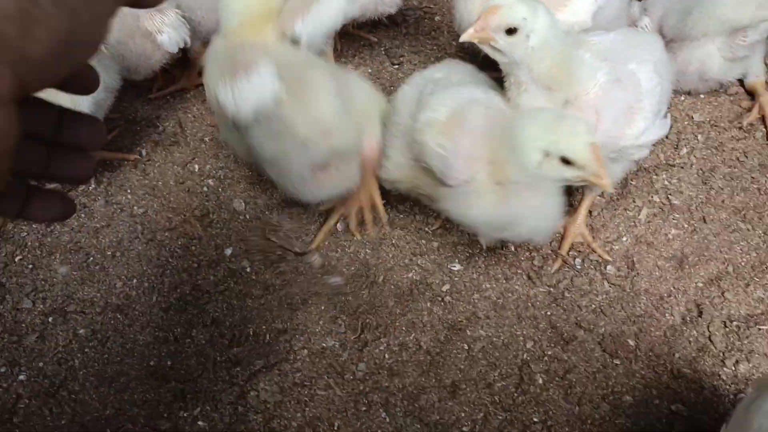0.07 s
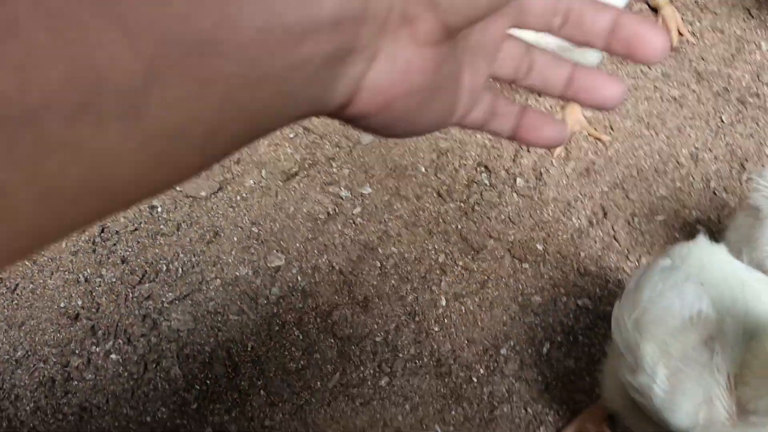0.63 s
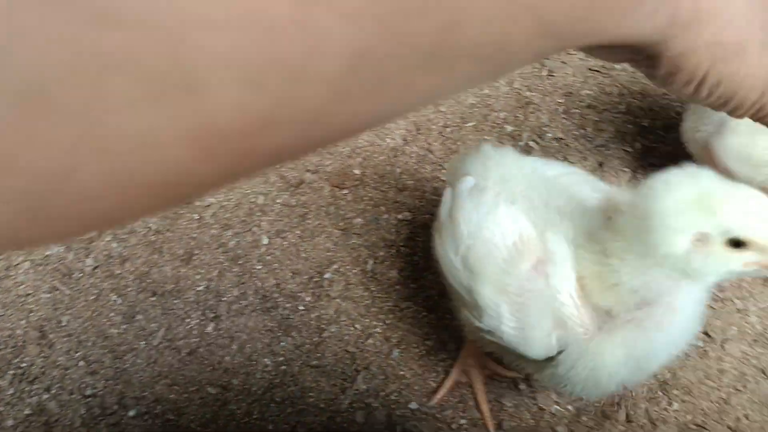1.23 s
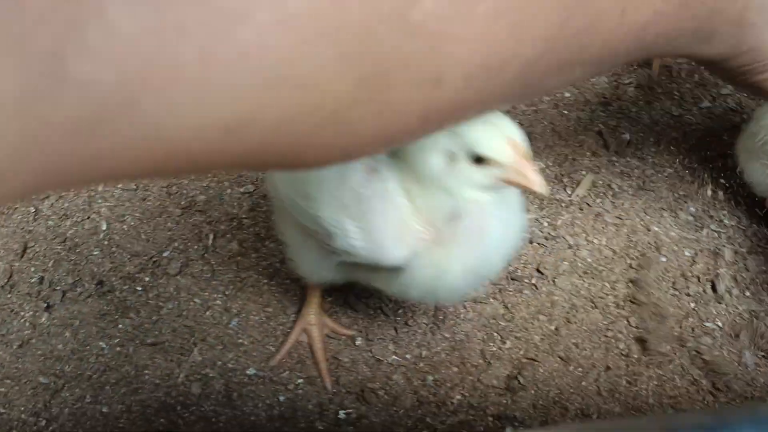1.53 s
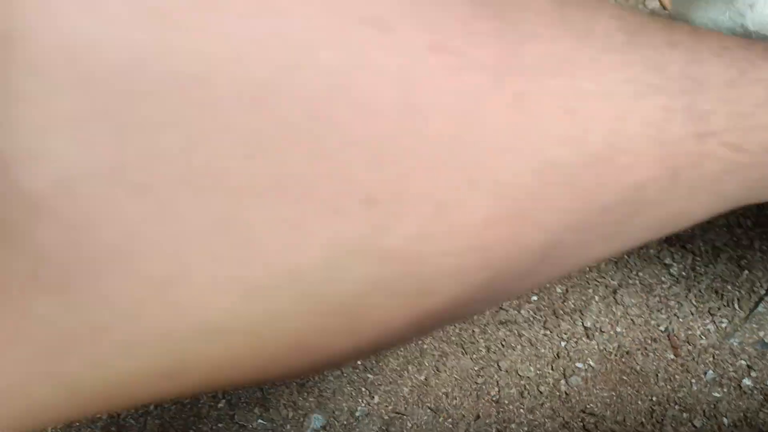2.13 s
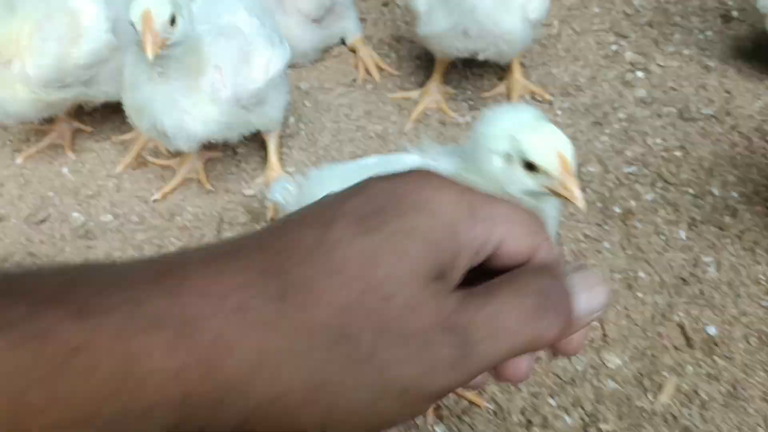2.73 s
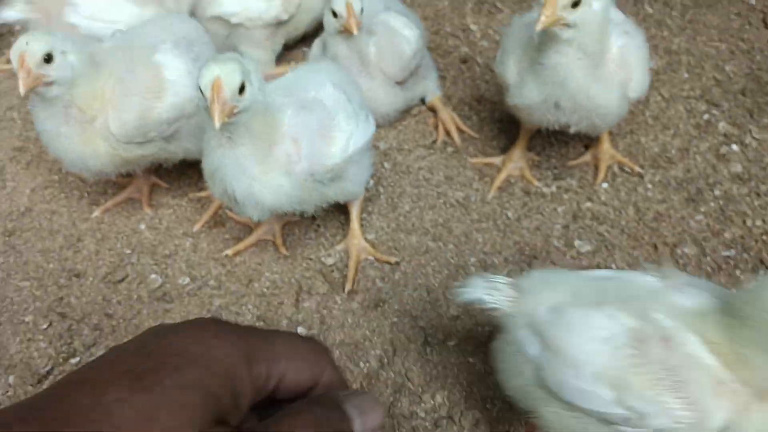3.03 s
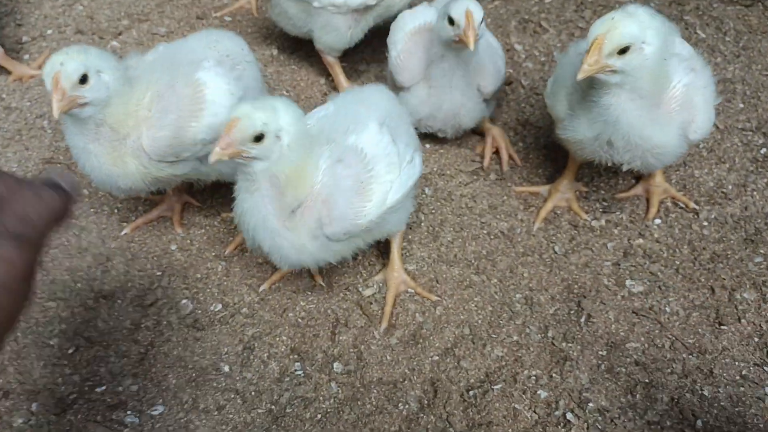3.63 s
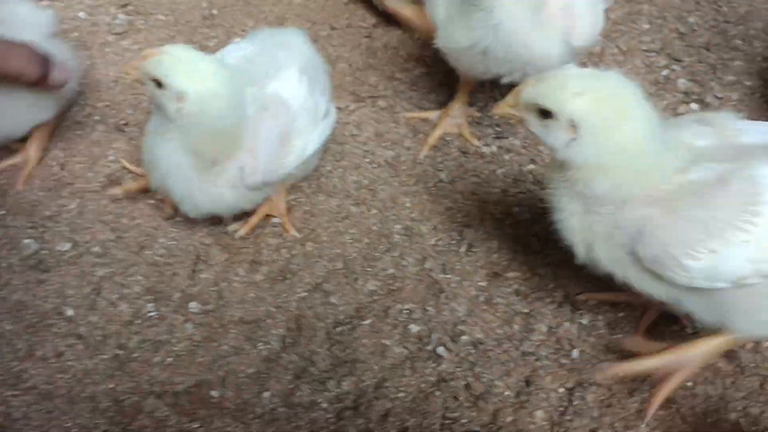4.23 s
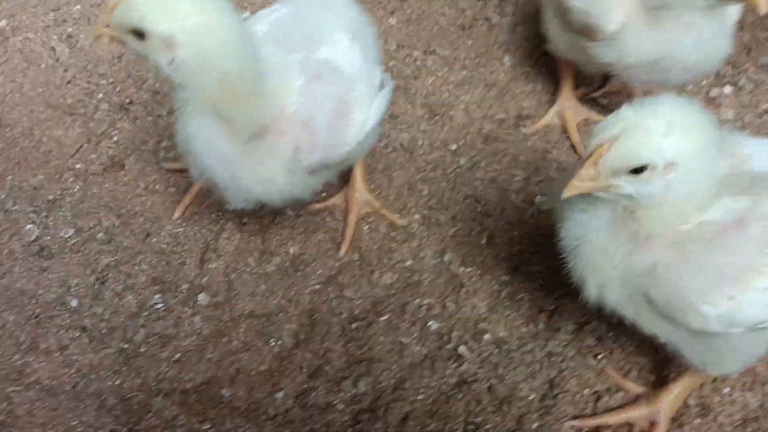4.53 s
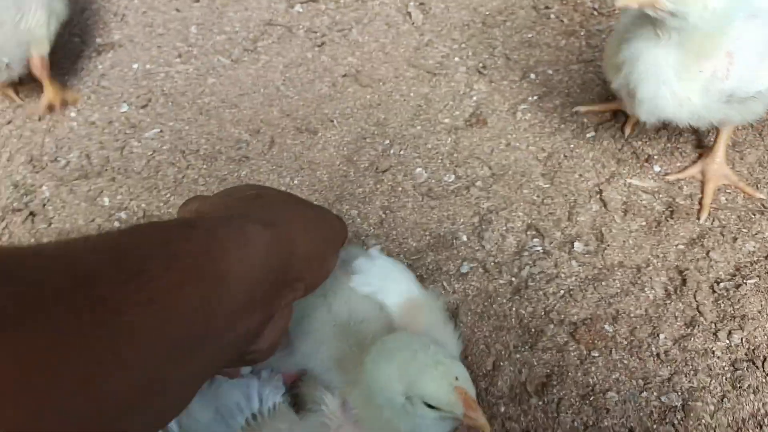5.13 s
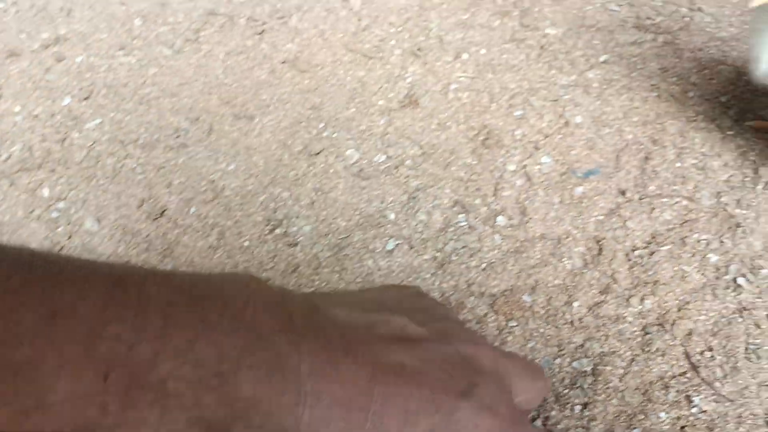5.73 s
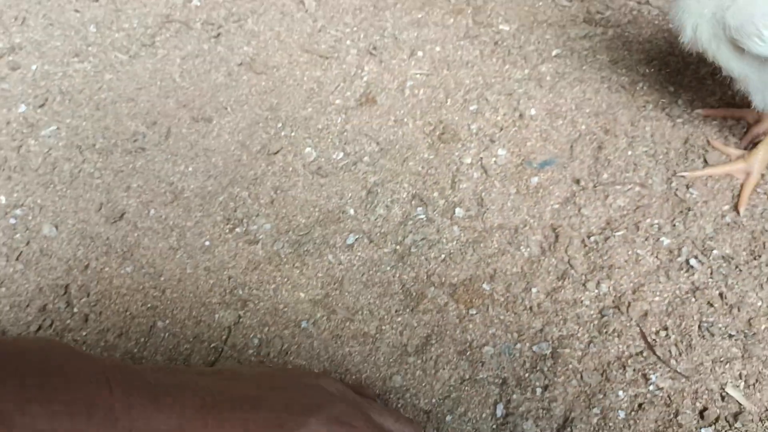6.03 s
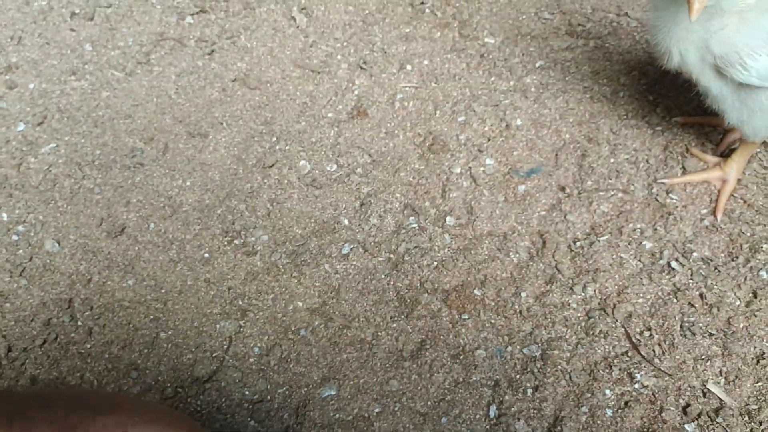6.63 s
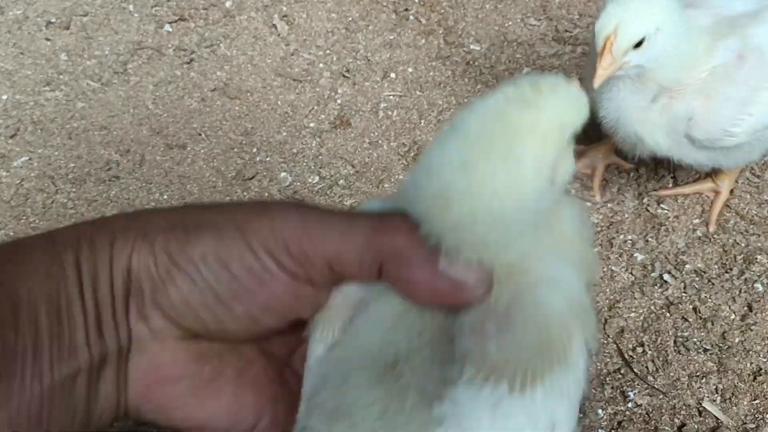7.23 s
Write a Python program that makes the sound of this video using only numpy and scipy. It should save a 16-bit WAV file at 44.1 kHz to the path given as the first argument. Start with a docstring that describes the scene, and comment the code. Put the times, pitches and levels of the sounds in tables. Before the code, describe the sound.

Young chicks cheep and trill softly on a barn's dirt floor, with a faint flock behind them. Grit ticks and crackles, and the hand-held microphone rumbles and bumps as it moves. A hand slaps once, early on. From about halfway, a chick being caught peeps loudly and shrilly close by, over and over, with a short echo. Ventilation hums very faintly underneath.

```python
"""Chicks peep on a barn's dirt floor while a hand reaches in and catches one. Each voice is a near-sine syrinx
whistle with overtones and rasp. The flock cheeps and trills softly; the caught chick calls loudly in two pitch
arches with a break between, and once a farther chick calls the same way. The barn echoes the calls. Litter
ticks and crackles, skin and cloth scuff, the hand slaps once, and the hand-held microphone rumbles as it moves.
Ventilation hums faintly."""
import sys
import numpy as np
from scipy import signal
from scipy.io import wavfile
from scipy.ndimage import uniform_filter1d, map_coordinates

SR = 44100
rng = np.random.default_rng(int(sys.argv[2]) if len(sys.argv) > 2 else 0)


def dump_mix(stems):
    """Bounce the given channels to the path in sys.argv[1] as a 16-bit WAV at rate SR."""
    frames = np.atleast_2d(stems).T  # one column per channel
    limited = np.clip(frames, -1, 1)  # hard clip at full scale
    pcm = np.round(limited * 32767).astype(np.int16)
    wavfile.write(sys.argv[1], SR, pcm)


N = 320607
TIME_S = np.arange(N) / SR

# Levels are relative, ahead of the mix gains; pitches are nominal.
# ventilation lines: f/Hz, rms level/dB
VENT_HUM = [(489, -83), (586, -94.5), (641, -81.5), (1017, -102)]
# far flock envelope: t/s, level/dB
FLOCK_ENVELOPE = [(0.0, -45.5), (0.6, -72.5), (1.0, -55), (1.6, -50), (2.1, -76), (2.36, -34), (2.6, -85),
                  (2.9, -50), (3.2, -49), (3.9, -55), (4.45, -46), (5.2, -53), (5.95, -56), (6.4, -69),
                  (7.27, -47.5)]
# litter crackle envelope: t/s, level/dB
CRACKLE_ENVELOPE = [(0.0, -72), (0.12, -54.5), (0.24, -57.5), (0.58, -71.5), (0.77, -56), (0.97, -60.5),
                    (1.54, -67), (1.64, -58.5), (1.98, -72), (2.17, -51.5), (2.61, -68), (2.79, -59),
                    (3.52, -58.5), (4.31, -59), (4.51, -62), (4.66, -63), (5.06, -59), (5.47, -63),
                    (6.5, -58.5), (7.27, -56)]
# grit and claw ticks: t/s, level/dB
GRIT_TICKS = [(0.0818, -27.5), (0.3087, -31), (0.5486, -25.5), (0.6514, -38), (0.719, -39), (1.173, -30.5),
              (1.2846, -29), (1.553, -31.5), (1.6018, -49), (1.731, -20), (1.9583, -35.5), (2.0921, -44),
              (2.5443, -27), (2.6806, -30), (2.7656, -29.5), (3.078, -38), (3.4985, -32), (3.6256, -51),
              (3.7697, -30), (3.8946, -31), (4.0275, -38), (4.7441, -48.5), (4.899, -26), (5.21, -42),
              (5.302, -33), (5.5518, -20.5), (7.1805, -28)]
# microphone rumble envelope: t/s, level/dB
RUMBLE_ENVELOPE = [(0.0, -72), (0.16, -71), (0.42, -39), (0.47, -60), (0.53, -30.5), (0.56, -46.5),
                   (0.97, -37.5), (1.03, -53.5), (1.62, -34.5), (1.84, -50.5), (1.88, -37), (2.0, -55),
                   (2.09, -29.5), (2.27, -53.5), (2.73, -46.5), (2.81, -59.5), (3.02, -46), (3.06, -68),
                   (3.52, -51.5), (3.56, -64.5), (4.27, -41.5), (4.84, -40.5), (4.88, -52), (5.0, -43.5),
                   (5.14, -81), (5.47, -53.5), (5.49, -73), (6.03, -80), (6.12, -39), (6.48, -78),
                   (6.6, -45), (6.94, -41.5), (7.15, -71.5), (7.27, -75)]
# knocks on the microphone case: t/s, level/dB
CASE_KNOCKS = [(0.534, -50), (0.622, -41), (0.804, -22), (1.459, -25), (1.866, -38), (2.063, -21),
               (2.098, -18.5), (4.288, -21.5)]
# soft single cheeps, plus at 6.183 s a brief low note closing the loud peep before it: t/s, length/s, start
# f/Hz, end f/Hz, level/dB
SOFT_CHEEPS = [(0.058, 0.035, 2430, 1790, -35), (0.093, 0.049, 2633, 2390, -23),
               (0.16, 0.028, 3680, 3050, -41), (0.177, 0.018, 1984, 1850, -32.5),
               (0.352, 0.035, 2430, 1916, -38.5), (0.417, 0.04, 2660, 2290, -36),
               (0.434, 0.044, 3430, 3080, -49.5), (0.647, 0.039, 2240, 2040, -39),
               (0.746, 0.027, 2900, 2330, -40), (0.856, 0.041, 2394, 1815, -46),
               (1.061, 0.056, 2504, 2017, -29), (1.241, 0.041, 2573, 2350, -25.5),
               (1.29, 0.037, 2256, 2220, -38), (1.444, 0.048, 2295, 2085, -25),
               (1.565, 0.056, 2720, 2550, -21.5), (1.643, 0.025, 2610, 2710, -16),
               (2.254, 0.059, 2785, 2280, -26.5), (2.535, 0.028, 2594, 2506, -45),
               (2.667, 0.014, 2496, 2604, -34.5), (2.755, 0.092, 2445, 2130, -38),
               (2.925, 0.067, 2660, 2094, -25.5), (3.02, 0.061, 2610, 2310, -41.5),
               (3.193, .065, 2813, 2370, -40), (3.3, 0.051, 2770, 2370, -37.5),
               (3.382, 0.043, 3034, 2500, -29.5), (3.515, .055, 2477, 2123, -45),
               (3.635, 0.034, 2405, 2140, -38.5), (3.725, 0.06, 2537, 2417, -24),
               (3.895, 0.053, 2758, 2197, -40.5), (4.057, 0.035, 2410, 1644, -38),
               (4.194, 0.076, 2824, 2120, -40.5), (5.248, 0.023, 2447, 2250, -30.5),
               (5.434, 0.035, 2700, 2300, -36.5), (6.183, 0.015, 1250, 1490, -12),
               (7.247, 0.037, 3294, 3640, -23)]
# skin and cloth on the case: t/s, length/s, level/dB, resonance f/Hz, hiss share/dB
CASE_SCUFFS = [(0.217, 0.16, -48.5, 666, -37), (0.786, .16, -49.5, 660, -41),
               (1.286, 0.14, -55.5, 587, -35), (1.481, 0.02, -42, 1020, -35),
               (1.548, 0.14, -60.5, 700, 10.5), (1.901, 0.019, -47, 1410, -30),
               (1.919, 0.12, -49, 720, -1.5), (2.058, 0.045, -44, 282, -39), (2.146, 0.18, -53.5, 750, 5),
               (2.199, 0.093, -40, 436, -11), (3.26, 0.11, -58, 670, -6), (3.285, .18, -54, 285, -34),
               (3.646, 0.1, -54.5, 280, -34), (3.928, 0.24, -53.5, 271, -11.5),
               (4.271, 0.058, -42, 266, -36), (4.506, 0.14, -58, 208, -40), (5.345, 0.19, -67.5, 750, 18.5),
               (5.878, 0.13, -55, 317, -39), (6.992, 0.15, -65, 1188, -17)]
# near peeps (the row at 2.309 s is a farther chick, heard with much echo): t/s, length/s, break after/s, crest
# position/share of arch 1, arch 1 f/Hz, break f/Hz, # arch 2 f/Hz, end f/Hz, arch 1 level/dB, arch 2 level/dB,
# screech/0-1, rasp/dB, barn send/dB
NEAR_PEEPS = [(0.542, .1, 0.045, 0.29, 2660, 2440, 2620, 2030, -21, -26, 0.01, -6.5, -21),
              (1.599, 0.047, 0.02, 0.2, 3050, 2328, 3030, 2410, -19.5, -19.5, 0.71, -8, -17),
              (2.175, 0.036, 0.023, 0.29, 2920, 2020, 2340, 2170, -23.5, -31, 0.99, -32, -8),
              (2.309, 0.041, 0.036, 0.43, 3618, 2513, 2690, 2250, -14, -15.5, 0, -33.5, -3.5),
              (4.298, .051, .027, 0.7, 3363, 2880, 3074, 2460, -17, -11, 0.05, -25.5, -5.5),
              (4.359, 0.049, .029, 0.74, 3210, 2560, 3170, 2610, -14, -11.5, .1, -32, -18),
              (4.43, 0.052, 0.034, 0.56, 3400, 2437, 2360, 1860, -12.5, -15, 0, -40, -14.5),
              (4.486, 0.049, .027, 0.44, 2880, 2254, 2360, 1770, -17.5, -23, 0, -14, -12),
              (4.601, 0.045, .024, .42, 3250, 2026, 2987, 1720, -16, -14.5, .3, -21, -12.5),
              (4.66, .049, 0.018, 0.28, 3270, 2870, 3465, 1890, -32, -24, .3, -17, -22),
              (4.788, 0.083, 0.06, 0.51, 3385, 2140, 2976, 1620, -20.5, -16, 0.84, -33, -11),
              (4.892, 0.068, 0.037, 0.89, 3346, 2740, 2947, 1630, -18.5, -16.5, 0.28, -16.5, -12),
              (5.073, .058, 0.031, 0.33, 3340, 2150, 2870, 1830, -17.5, -10.5, 0.6, -38, -14.5),
              (5.282, 0.061, 0.035, 0.39, 3124, 2020, 2980, 1940, -18.5, -15.5, .1, -25, -18.5),
              (5.364, 0.046, 0.019, 0.43, 2957, 2905, 2895, 2110, -24.5, -15.5, 0.34, -32, -21.5),
              (5.533, 0.065, 0.037, 0.57, 3145, 2440, 2180, 1960, -21, -10.5, 1, -23, -9),
              (5.728, 0.052, .031, .35, 3220, 2040, 2886, 1710, -16.5, -11.5, 0.33, -43, -18.5),
              (5.807, .068, .038, 0.72, 3310, 2830, 2923, 1713, -11.5, -11, 0, -36, -20),
              (6.036, .057, .028, 0.68, 2908, 2680, 3004, 1410, -16, -13.5, 0, -8.5, -20.5),
              (6.118, 0.065, 0.039, 0.62, 3125, 2780, 3016, 1250, -14, -11, 0.12, -25, -23.5),
              (6.309, .054, .035, 0.42, 3070, 1870, 2760, 1490, -11.5, -12.5, 0.01, -14, -19.5),
              (6.415, 0.069, 0.048, 0.62, 2970, 1956, 1682, 1343, -12, -14.5, 0.2, -17.5, -19),
              (6.687, .058, 0.028, 0.63, 3006, 2803, 3037, 1320, -17, -11, 0, -7, -20.5),
              (6.793, 0.049, 0.012, 0.092, 3250, 2744, 2910, 1400, -28.5, -15.5, 0.33, -17, -20.5)]
# bearing of the peeping chick: t/s, left over right at 2800 Hz/dB
PEEP_BEARING = [(0.55, 9), (1.6, 9.5), (2.3, 4), (4.33, 1.5), (4.45, 11), (5.3, 12), (5.6, 22), (5.8, 8.5),
                (6.4, 10.5), (6.75, 16)]
# pleasure trills: t/s, length/s, f/Hz, level/dB
PLEASURE_TRILLS = [(1.479, 0.089, 2777, -26.5), (1.787, 0.073, 2860, -25), (1.945, .066, 2790, -30.5)]
# spectra of room air, grit, rumble and slap: f/Hz, level/dB
AIR_SPECTRUM = [(24, -37.5), (40, -10.5), (166, 3.5), (401, -19.5), (1410, -17.5), (2440, -7), (3130, -22),
                (6000, -67), (7800, -61), (13200, -120)]
GRIT_SPECTRUM = [(500, -25), (3000, 20), (5500, -17), (7300, 25), (10500, 10), (13000, 10), (16000, -2.5)]
RUMBLE_SPECTRUM = [(25, -50.5), (45, -14.5), (70, 10), (100, 10), (160, 2), (250, -8.5), (400, -66),
                   (800, -96)]
SLAP_SPECTRUM = [(400, -46), (700, -30), (1000, -3), (2200, -8), (3400, 4), (5000, -11.5), (9000, -8),
                 (15000, -73)]
# throat response: f/Hz, gain/dB
THROAT_RESPONSE = [(1200, 28), (2000, 11), (3000, 8), (4000, 12.5), (5200, -10), (6300, -10.5),
                   (7500, -7.5), (9300, -14.5), (12500, -21), (15500, -34.5)]

CUTOFF_HZ = 16300


def from_db(db):
    """Decibels to gain."""
    return 10 ** (np.asarray(db) / 20)


def unit_rms(x):
    """Scale to rms 1."""
    return x / np.sqrt(np.mean(x ** 2) + 1e-20)


def envelope(rows):
    """Gain over time from rows of t/s, level/dB."""
    return from_db(np.interp(TIME_S, *np.transpose(rows)))


def db_at(spectrum, hz):
    """Read a spectrum on a log-frequency axis."""
    freqs_hz, levels_db = np.transpose(spectrum)
    return np.interp(np.log(hz), np.log(freqs_hz), levels_db)


def band(x, low_hz, high_hz):
    """Butterworth band-pass."""
    sos = signal.butter(2, [low_hz, min(high_hz, .48 * SR)], "band", fs=SR, output="sos")
    return signal.sosfilt(sos, x + 1e-18)


def high_pass(x, edge_hz):
    """Steep low cut."""
    return signal.sosfilt(signal.butter(6, edge_hz, "high", fs=SR, output="sos"), x + 1e-18)


def wander(rate_hz, size):
    """Smooth random curve, spread about 1."""
    at = np.arange(size) * rate_hz / SR
    return map_coordinates(rng.standard_normal(int(at[-1]) + 2), [at], order=3, mode="nearest")


def pan(left_db):
    """Stereo gains of mean power 1, steady or moving."""
    gains = from_db(np.atleast_1d(left_db) / 2 * [[1], [-1]])
    return gains / np.sqrt(np.mean(gains ** 2, axis=0))


def noise(spectrum, correlation, size=N):
    """Stereo noise from half-octave bands; rms 1."""
    out, edges_hz = 0, 22 * 2 ** (np.arange(20) / 2)
    white = rng.standard_normal((2, 2, size))
    for k, (low, high) in enumerate(zip(edges_hz, edges_hz[1:])):
        if low < spectrum[-1][0] and high > spectrum[0][0] / 2:
            out = out + from_db(db_at(spectrum, np.sqrt(low * high))) * band(white[k % 2], low, high)
    mid, side = out
    return unit_rms(np.sqrt(1 + correlation) * mid + np.sqrt(1 - correlation) * side * [[1], [-1]])


def decays(rows, t60_s):
    """Envelope that jumps at each t/s, level/dB and dies away."""
    kicks = np.zeros(N)
    for at_s, db in rows:
        kicks[int(at_s * SR)] += from_db(db)
    return signal.lfilter([1], [1, -from_db(-60 / (t60_s * SR))], kicks + 1e-18)


def add(track, at_s, sound):
    """Mix a stereo sound into a track."""
    start = max(int(at_s * SR), 0)
    part = track[:, start:start + sound.shape[1]]
    part += sound[:, :part.shape[1]]


def barn_air():
    """Faint steady air with wavering ventilation hum."""
    hum = sum(from_db(db) * np.sqrt(2) * np.sin(2 * np.pi * hz * TIME_S + wander(1.9, N))
              for hz, db in VENT_HUM)
    return hum + from_db(-64) * noise(AIR_SPECTRUM, 0.21)


def syrinx(pitch_hz, amplitude, rasp_db, overtone_db, slope_db_per_oct=-11, buzz=1.35):
    """Whistle with throat-filtered overtones; rasp adds sidebands and a half-pitch line."""
    size = len(pitch_hz)
    # membranes slip in fast glides and rattle at the top of their range
    slip = np.minimum(abs(np.gradient(np.log(pitch_hz))) * SR / 60, 1.5)
    strain = np.clip((pitch_hz - 3250) / 300, 0, 1)
    jitter = (0.0048 + 0.08 * slip) * wander(913, size)
    phase = 2 * np.pi * np.cumsum(pitch_hz * (1 + jitter)) / SR
    tone = np.sin(phase)
    for k in range(2, 7):
        throat_db = db_at(THROAT_RESPONSE, k * pitch_hz) - db_at(THROAT_RESPONSE, pitch_hz)
        gain_db = overtone_db + slope_db_per_oct * np.log2(k / 2) + throat_db + 6.1 * wander(101, size)
        tone += from_db(gain_db) * np.sin(k * phase) * (k * pitch_hz < CUTOFF_HZ)
    half_pitch = 0.47 * np.sin(phase / 2 + wander(200, size)) * (1 + buzz * np.cos(phase))
    roughness = (0.33 * from_db(rasp_db) + 0.23 * strain) * wander(700, size)
    roughness += 0.13 * slip * wander(2500, size)
    return amplitude * (tone * (1 + roughness) + from_db(rasp_db) * half_pitch)


def cheep(length_s, crest_share, start_hz, end_hz, rasp_db, overtone_db):
    """Contented note: swells and fades on an arched glide."""
    u = np.linspace(0, 1, max(int(length_s * SR), 200))
    glide_hz = start_hz + (end_hz - start_hz) * u ** 1.52
    pitch_hz = glide_hz * (1 - 0.063 * (2 * u - 1) ** 4 + 0.02085 * wander(113, len(u)))
    amplitude = np.interp(u, [0, crest_share, 1], [0, 1, 0]) ** 0.68
    return syrinx(pitch_hz, amplitude, rasp_db, overtone_db)


def barn_echo(x, t60_s=0.36, early_s=0.022, early_gain=3.2):
    """Dense scatter from floor and nearby bodies, then the hall's tail."""
    t = np.arange(int(.7 * SR)) / SR
    decay = (from_db(-60 * t / t60_s) + early_gain * np.exp(-t / early_s)) * (t > .002)
    response = band(rng.standard_normal((2, len(t))), 400, 3900) * decay
    response /= np.sqrt(np.sum(decay ** 2))
    return signal.fftconvolve(x.mean(axis=0)[None], response, axes=1)[:, :N]


def far_flock(count=140, centre_hz=2500, fall_ratio=.86, direct_gain=0.38):
    """Distant random cheeps, dulled and blurred by the barn; rms 1."""
    out = np.zeros((2, N))
    for k, (offset, stretch, detune, side) in enumerate(rng.uniform(-0.91, 1, (count, 4))):
        hz = centre_hz * (1 + 0.22 * detune)
        note = cheep(0.093 + 0.03 * stretch, 0.39, hz, hz * fall_ratio, rasp_db=-18.5, overtone_db=-9.5)
        add(out, (k + offset) * TIME_S[-1] / count, note * pan(8 * side))
    return unit_rms(band(direct_gain * out + barn_echo(out), 2080, 4440))


def litter(grain_count=90):
    """Grit ticks and crumbles over fine crackle; such small grains sound mainly in the treble."""
    ticks = from_db(-8) * decays(GRIT_TICKS, t60_s=0.019)
    crumble = from_db(-21) * decays(GRIT_TICKS, t60_s=0.23)
    grains = decays([(share * TIME_S[-1], 0) for share in rng.random(grain_count)], t60_s=0.035)
    crackle = from_db(-3) * envelope(CRACKLE_ENVELOPE) * (from_db(6.47 * wander(19, N)) + 3.5 * grains)
    flicker = from_db(2 * wander(640, N))
    grit = (ticks + crumble + crackle) * flicker * noise(GRIT_SPECTRUM, .15) * pan(12.2)
    return high_pass(grit, 6500) + from_db(-28.5) * grit


def handling():
    """Lumpy rumble of the moving microphone; each port takes the case knocks differently."""
    lumpy_noise = unit_rms(noise(RUMBLE_SPECTRUM, 0) * from_db(4 * wander(35, N)))
    rumble = from_db(2.5) * envelope(RUMBLE_ENVELOPE) * lumpy_noise
    knocks = from_db(9.5) * decays(CASE_KNOCKS, t60_s=0.0063)
    return rumble + np.array([band(knocks, 60, 181), band(knocks, 134, 247)])


def beak(x):
    """So small a mouth radiates no bass."""
    return high_pass(high_pass(x, edge_hz=1020), edge_hz=1550)


def soft_cheeps():
    """Chicks round about, mostly left, plus a brief low note closing the loud peep at 6.12 s; fainter means
    farther, so more echo. Returns direct, send."""
    direct, send = np.zeros((2, 2, N))
    mean_db = np.mean(SOFT_CHEEPS, axis=0)[-1]
    sides = rng.standard_normal(len(SOFT_CHEEPS))
    for (at_s, length_s, start_hz, end_hz, db), side in zip(SOFT_CHEEPS, sides):
        note = cheep(length_s, 0.6, start_hz, end_hz, rasp_db=-17, overtone_db=-17.5)
        add(direct, at_s, note * from_db(db) * pan(11 + 2 * side))
        add(send, at_s, note * from_db(-37 + 0.4 * (db - mean_db)) * pan(0))
    return beak(direct), beak(send)


def scuffs(edge_ratio=1.175):
    """Skin and cloth catch on the case and trail off: grainy friction, two resonances, hiss."""
    out = np.zeros((2, N))
    for at_s, length_s, db, hz, hiss_db in CASE_SCUFFS:
        u = np.linspace(0, 1, int(length_s * SR))
        friction = rng.standard_normal(len(u)) + .5 * rng.standard_normal((2, len(u)))
        friction *= from_db(2 * wander(225.3, len(u)))
        lower, upper = (unit_rms(band(friction, f / edge_ratio, f * edge_ratio))
                        for f in (hz, 2.166 * hz))
        hiss = from_db(hiss_db) * unit_rms(band(band(friction, 610, 2800), 1200, 6000))
        amplitude = from_db(db) * np.interp(u, [0, .15, 1], [0, 1, .1])
        add(out, at_s, amplitude * (lower + from_db(-9) * upper + hiss))
    return out


def arch(t, start_s, crest_s, end_s, start_hz, top_hz, end_hz):
    """Pitch climbs to a rounded top, then falls ever faster."""
    rise = np.clip((crest_s - t) / max(crest_s - start_s, 1e-4), 0, 1) ** 2.1
    fall = np.clip((t - crest_s) / max(end_s - crest_s, 1e-4), 0, 1) ** 2.2
    return top_hz + (start_hz - top_hz) * rise + (end_hz - top_hz) * fall


def near_peeps(attack_s=0.0056, surge_s=0.0057, release_s=0.0013, inertia_s=0.001, port_lag_s=6e-5):
    """Close calls: two pitch arches, a voice break between, a final fall; one call comes from a farther chick.
    Returns direct, send."""
    direct, send = np.zeros((2, 2, N))
    for (at_s, length_s, break_s, crest_share, first_hz, break_hz, second_hz, end_hz,
         first_db, second_db, screech, rasp_db, send_db) in NEAR_PEEPS:
        t = np.arange(0, length_s, 1 / SR)
        crest1_s, crest2_s = crest_share * break_s, break_s + 0.429 * (length_s - break_s)
        linger_s = 2.5e-6 * (first_hz - break_hz)   # deeper breaks stay down longer
        down_s, up_s = break_s - linger_s, break_s + linger_s
        arch1_hz = arch(t, 0, crest1_s, down_s, .88 * first_hz, first_hz, break_hz)
        arch2_hz = arch(t, up_s, crest2_s, length_s, break_hz, second_hz, end_hz)
        pitch_hz = uniform_filter1d(np.where(t < break_s, arch1_hz, arch2_hz), int(inertia_s * SR))
        # screech: jitter that settles along arch 1
        jitter = 0.091 * screech * np.clip(1 - t / break_s, 0, 1) * wander(900, len(t))
        surge_at_s = down_s - surge_s   # arch 2's level arrives just before the break
        db = np.interp(t, [0, min(crest1_s, surge_at_s), surge_at_s, down_s, crest2_s, length_s],
                       [first_db - 8, first_db, first_db, second_db - 2, second_db, second_db - 6])
        amplitude = from_db(db) * np.minimum(1, np.minimum(t / attack_s, (length_s - t) / release_s))
        overtone_db = -9 + 0.46 * (db - db.max())   # louder is brighter
        call = syrinx(pitch_hz * np.exp(jitter), amplitude, rasp_db - 8 * t / length_s, overtone_db,
                      slope_db_per_oct=-2, buzz=0.39)
        # far port: later, and shaded more by the case as pitch rises
        ports = np.array([call, np.interp(t - port_lag_s, t, call)])
        left_db = np.interp(at_s, *np.transpose(PEEP_BEARING)) * pitch_hz / 2800
        add(direct, at_s, ports * pan(left_db))
        add(send, at_s, ports * from_db(send_db))
    return beak(direct), beak(send)


def trills(arch_count=3):
    """Pitch bounces in small arches along a shallow bow; the note swells and fades."""
    out = np.zeros((2, N))
    for at_s, length_s, hz, db in PLEASURE_TRILLS:
        u = np.linspace(0, 1, int(length_s * SR))
        bounce = 0.08 * (1 - abs(np.sin(np.pi * arch_count * u)))
        bow = 0.0646 * (2 * u - 1) ** 2
        amplitude = from_db(db) * (4 * u * (1 - u)) ** 0.75
        note = syrinx(hz * (1 - bounce - bow), amplitude, rasp_db=-16, overtone_db=-15.5)
        add(out, at_s, note * pan(6.6))
    return beak(out)


def hand_slap(at_s=1.7295, crack_t60_s=0.056, tail_t60_s=0.13):
    """One sharp slap with a crunchy tail."""
    out, t = np.zeros((2, N)), np.arange(SR // 2) / SR
    decay = from_db(-60 * t / crack_t60_s) + from_db(-13 - 60 * t / tail_t60_s)
    crunch = from_db(1.5 * wander(650, len(t)))
    add(out, at_s, from_db(-19.5) * decay * crunch * noise(SLAP_SPECTRUM, 0.26, len(t)) * pan(3))
    return out


def scene():
    """Chicks and slap with barn echo; close noises and air added dry."""
    peeps, peep_send = near_peeps()
    cheeps, cheep_send = soft_cheeps()
    trill, slap = trills(), hand_slap()
    send = from_db(4) * peep_send + cheep_send + from_db(-16.5) * trill + from_db(5) * slap
    echo = barn_echo(send) * pan(7.3)
    flock = from_db(-2) * envelope(FLOCK_ENVELOPE) * far_flock() * pan(9.5)
    chicks = peeps + trill + from_db(-1.5) * cheeps + flock
    return chicks + slap + echo + litter() + handling() + scuffs() + barn_air()


def record(dry):
    """Steep elliptic low-pass."""
    return signal.sosfilt(signal.ellip(10, .1, 90, CUTOFF_HZ, fs=SR, output="sos"), dry)


dry = scene()
out = record(dry)
dump_mix(out)
```